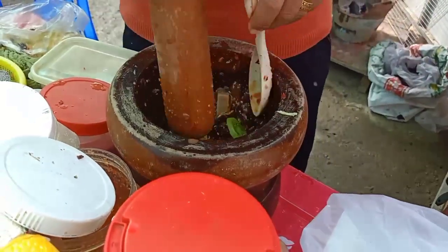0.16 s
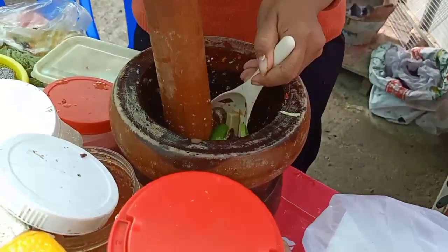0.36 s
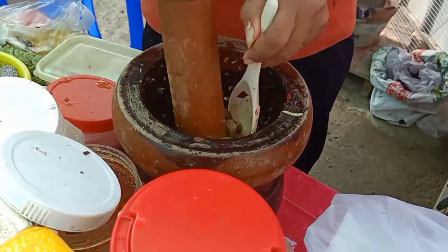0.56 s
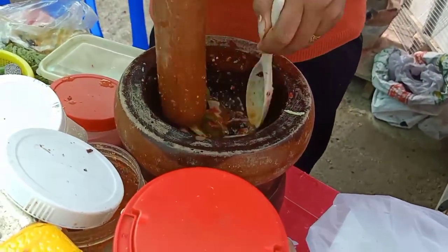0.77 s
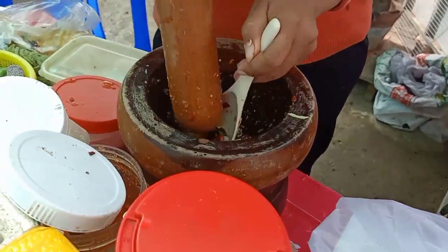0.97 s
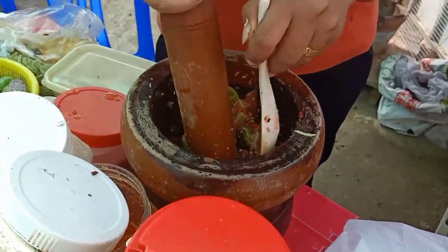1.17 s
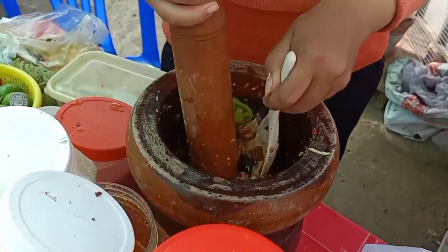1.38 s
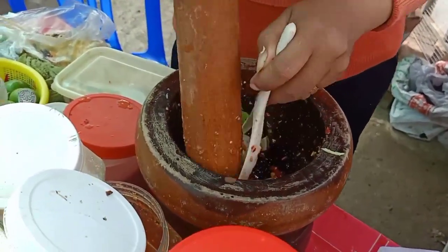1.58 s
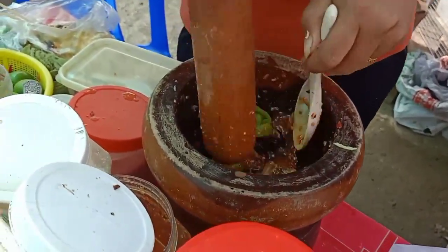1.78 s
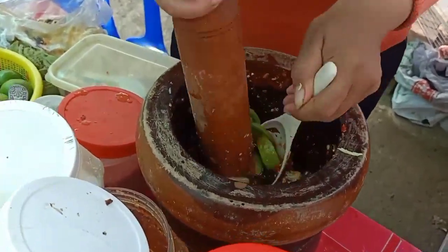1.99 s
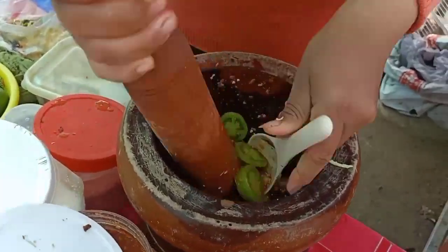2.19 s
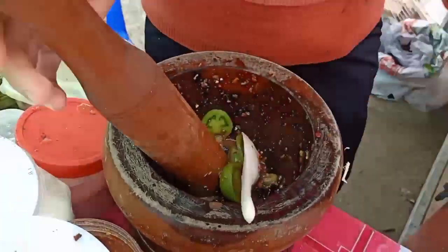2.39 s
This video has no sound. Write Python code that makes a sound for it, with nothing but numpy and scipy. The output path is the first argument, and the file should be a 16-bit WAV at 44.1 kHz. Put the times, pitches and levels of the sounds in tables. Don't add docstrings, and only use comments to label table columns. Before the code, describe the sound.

Close up at an outdoor stall, uneven pestle blows knock a hollow clay bowl and squash wet food, gritty spoon scrapes fill the gaps, and light taps end it over low traffic rumble, heard in phone stereo.

```python
import sys
import numpy as np
from scipy import signal
from scipy.fft import rfft, irfft, next_fast_len
from scipy.io import wavfile
from scipy.ndimage import uniform_filter1d, map_coordinates

SR = 44100
rng = np.random.default_rng(int(sys.argv[2]) if len(sys.argv) > 2 else 0)


def file_out(sig):
    cols = np.atleast_2d(sig).T
    lim = np.clip(cols, -1, 1)
    pcm = np.round(lim * 32767).astype(np.int16)
    wavfile.write(sys.argv[1], SR, pcm)


def boost_factor(decibels):
    exponent = np.asarray(decibels, float) / 20
    return 10 ** exponent


N = 108045


def unit(x):
    return x / np.sqrt(np.mean(x ** 2) + 1e-20)


def along(points, hz):
    f, v = np.transpose(points)
    return np.interp(np.log(hz + 1), np.log(f + 1), v)


def wobble(knots_per_s):
    knots = rng.standard_normal(int(N * knots_per_s / SR) + 4)
    return map_coordinates(knots, [np.arange(N) * knots_per_s / SR])


def filtered(x, response):
    m = next_fast_len(N + 8192)
    return irfft(rfft(x, m) * response(np.fft.rfftfreq(m, 1 / SR)), m)[..., :N]


def resonances(table):
    def response(f):
        total = 0
        for k, (hz, width_hz, db) in enumerate(table):
            band = 1j * f * width_hz / (hz * hz - f * f + 1j * f * width_hz)
            total = total + (-1) ** k * boost_factor(db) * band
        return total
    return response


# start in seconds, peak in dB, second ring over first in dB,
# third ring over first in dB, left-right in dB.
BLOWS = [
    (0.058, -19, -27.5, -7, -3.5),
    (0.3212, -14, -19.5, -8, 0.5),
    (0.367, -28.5, -23, -31, 1),
    (0.612, -31, -24, -21, -3.5),
    (0.844, -17.5, -19, -13, -1.5),
    (1.381, -16.5, -18, -19, 0),
    (1.679, -26, -42, -17, -7),
    (1.948, -15, -21.5, -9, -6),
    (2.358, -51, -14, 3, -0.5),
    (2.431, -44.5, -17, 12.5, -8),
]
CONTACT_MS = [1.25, 2.84, 1.8, 0.86, 3.5, 3.1, 1.3, 3.2, 0.45, 0.16]
THUMP_DB = [0, -3, 7, -2, -3, -0.5, 9.5, -9, .1, 9]
LOW_MODES_DB = [5, -1, 3, 4, 4, 0, -1, -4, 19.5, -6]
# frequency in Hz, level in dB, t60 in seconds, left-right in dB,
# left lead in radians.
FIRST_MODES = [(788.7, 5.5, 0.06, 4.5, -0.76), (693, -9, 0.039, -4.5, -0.79), (546, -31, 0.083, 8, -0.63),
               (1000, -8, 0.015, 27, 0.16)]
SECOND_MODES = [(1333, 5, 0.056, -28, 0.16), (1405, 4.3, 0.07, -6, 0.3)]
THIRD_MODES = [(2090, 3, 0.034, .1, 1.64), (1770, -9, 0.062, -2.5, -1.9), (2400, -6, 0.048, -4, 2.8),
               (3000, -4, .016, -1, 2.1)]
TABLE_MODES = [(175.5, -19, 0.064, .1, .05), (240, -41.5, 0.14, 0.044, .05)]
# frequency in Hz, width in Hz, level in dB.
SQUEEZE = [(563, 220, 3.5), (970, 360, 2.5), (2600, 1050, -13.5)]
SLAP_DB, SLAP_T60_S = -24.5, 0.0075
SQUEEZE_DB, SQUEEZE_T60_S = -12, 0.041
CHOKE = 1.086
SCATTER_DB, DETUNE = 6.5, 0.005
SAME, OPPOSED = 1, -1


def ring(modes, pan_db, flip, t):
    side = np.array([[0.5], [-0.5]])
    total = np.zeros((2, len(t)))
    for k, (hz, db, t60_s, lean_db, lead) in enumerate(modes):
        if k > 0:
            db = db + rng.normal(0, SCATTER_DB)
            hz = hz * (1 + rng.normal(0, DETUNE))
        decay = boost_factor(db + side * (lean_db + pan_db) - 60 * (t / t60_s) ** CHOKE)
        total += flip ** k * decay * np.sin(2 * np.pi * hz * t + side * lead)
    return total


def pestle():
    out, t = np.zeros((2, N + SR)), np.arange(SR // 4) / SR
    for blow, contact_ms, thump_db, low_db in zip(BLOWS, CONTACT_MS, THUMP_DB, LOW_MODES_DB):
        start_s, peak_db, second_db, third_db, pan_db = blow
        body = ring(FIRST_MODES[::3], pan_db, SAME, t)
        body += boost_factor(low_db) * ring(FIRST_MODES[1:3], pan_db, SAME, t)
        body += boost_factor(second_db) * ring(SECOND_MODES, 0, OPPOSED, t)
        body += boost_factor(thump_db) * ring(TABLE_MODES, 0, SAME, t)
        slap = boost_factor(SLAP_DB - 60 * t / SLAP_T60_S) * rng.standard_normal((2, len(t)))
        dull = unit(filtered(rng.standard_normal(len(t)), resonances(SQUEEZE))[:len(t)])
        squeeze = boost_factor(SQUEEZE_DB - 60 * t / SQUEEZE_T60_S) * dull
        sharp = boost_factor(third_db) * ring(THIRD_MODES, 0, SAME, t) + slap + squeeze
        press = (1 - np.exp(-t * 2000 / contact_ms)) ** 2
        onset = 1 - np.exp(-t / 0.00025)
        at = round(start_s * SR)
        out[:, at:at + len(t)] += boost_factor(peak_db) * (body * press + sharp * onset)
    return out[:, :N]


# start in seconds, length in seconds, grit in dB, bowl over grit in dB,
# rise as share of the length.
STROKES = [(0.075, 0.091, -44, 8, 0.26), (0.222, 0.023, -46.5, 1, 0.16), (0.283, 0.071, -44, -4, 0.081),
           (0.324, 0.1, -46, 7, 0.35), (0.596, 0.11, -53, 12.5, 0.077), (0.749, 0.013, -48, -5, .08),
           (0.819, 0.071, -47.5, -4, .2), (0.863, 0.085, -42, 6, 0.67), (0.97, 0.063, -60.5, 2.5, 0.23),
           (1.13, 0.085, -47, 3.5, 0.48), (1.187, 0.042, -49.5, 7.5, 0.028), (1.343, 0.11, -43.5, -7, 0.3),
           (1.42, 0.083, -50, 9, 0.21), (1.48, 0.18, -64.5, 16, 0.23), (1.671, 0.038, -48.5, 2.5, 0.12),
           (1.699, 0.09, -47.5, 8, 0.33), (1.815, 0.065, -44, -6.5, 0.025),
           (1.912, 0.029, -46.5, -0.5, .08), (1.978, 0.071, -48, 7, 0.22), (2.229, 0.068, -51, 6, .2),
           (2.28, 0.065, -65, 8.5, 0.22)]
# frequency in Hz, level in dB per Hz.
GRIT = [(1470, -47), (2500, 7.5), (3360, 1.5), (3800, -1.5), (5150, 5.5), (8330, -17.5), (10400, -20),
        (13700, -15.5), (16000, -50)]
# frequency in Hz, width in Hz, level in dB.
BOWL = [(678, 44.5, 2.5), (1003, 28, -3.5), (1279, 43, 0.5), (1570, 216, -4), (2114, 192, 1),
        (2750, 360, -5.5)]
# frequency in Hz, width in Hz, level in dB.
SPOON = [(3890, 266, 10.5), (5400, 460, 6)]
STROKE_FALL = 0.33
JUDDER_DB, CLUMP_DB, GRAIN_DB, ROUGH_TOP_DB = 1.8, 3.5, 4, 9
WET_DB = 1


def spoon():
    t, grit, bowl = np.arange(N) / SR, np.zeros(N), np.zeros(N)
    for start_s, length_s, grit_db, bowl_db, rise in STROKES:
        u = (t - start_s) / length_s
        shape = np.clip(np.minimum(u / max(rise, 0.02), (1 - u) / STROKE_FALL), 0, 1)
        grit += boost_factor(grit_db) * shape
        bowl += boost_factor(grit_db + bowl_db) * shape
    rough_db = JUDDER_DB * wobble(70) + CLUMP_DB * wobble(250) + GRAIN_DB * wobble(1100)
    rough = unit(boost_factor(np.minimum(rough_db, ROUGH_TOP_DB)))

    def bright(hz):
        return boost_factor(along(GRIT, hz)) * (1 + resonances(SPOON)(hz))

    def scrape(level, response):
        gain = np.sqrt(np.mean(abs(response(np.fft.rfftfreq(4096, 1 / SR))) ** 2))
        return filtered(level * rough * rng.standard_normal((2, N)), response) / gain

    return boost_factor(WET_DB) * squelch(grit, bowl) + scrape(grit, bright) + scrape(bowl, resonances(BOWL))


GRAINS_PER_S, GRAIN_HZ, GRAIN_OCTAVES, GRAIN_CYCLES = 800, 2400, 0.8, 18
GRAIN_SIZE_DB, GRAIN_TOP_DB = 4, 9
SPLIT_HZ = 2900


def squelch(grit, bowl):
    count = round(GRAINS_PER_S * N / SR)
    when, pitch, size, phase = rng.random((count, 4)).T
    start, t = (when * N).astype(int), np.arange(600) / SR
    octaves = GRAIN_OCTAVES * np.log(pitch / (1 - pitch)) / 2
    hz = GRAIN_HZ * 2 ** octaves.clip(-1.6, 2)[:, None]
    stroke = np.where(hz[:, 0] > SPLIT_HZ, grit[start], bowl[start])
    gain = stroke * boost_factor(np.minimum(-GRAIN_SIZE_DB * np.log(size), GRAIN_TOP_DB))
    decay = gain[:, None] * boost_factor(-60 * t * hz / GRAIN_CYCLES) * (1 - np.exp(-t * hz / 2))
    turn = 2 * np.pi * (hz * t + phase[:, None])
    at = (start[:, None] + np.arange(600)).ravel()
    return np.array([np.bincount(at, (decay * wave(turn)).ravel(), N + 600)[:N] for wave in (np.sin, np.cos)])


# start in seconds, peak in dB, frequency in Hz.
TICKS = [(0.1, -16.5, 3870), (0.11, -24, 2250), (0.13, -38, 2600), (.153, -17.5, 2090), (0.231, -23, 5800),
         (.776, -35, 5170), (0.284, -29, 4630), (.311, -20.5, 2980), (.378, -17, 5400), (.390, -21, 2210),
         (.624, -17.5, 2750), (0.753, -30, 4740), (.833, -23, 4800), (0.898, -14.5, 2090),
         (.937, -28, 4500), (.925, -21, 2100), (1.186, -18.5, 1025), (1.208, -18.5, 990),
         (1.359, -24, 5100), (1.444, -17.5, 2460), (1.461, -17.5, 3840), (1.492, -22, 1970),
         (1.765, -24, 2500), (1.8141, -14.5, 5030), (1.862, -18, 4070), (1.919, -28, 2470),
         (1.993, -16.5, 2530), (2.012, -27.5, 2280), (2.018, -17.5, 3130), (0.096, -40, 5000),
         (.114, -20, 5100), (.119, -35, 2340), (0.1318, -22, 4820), (0.137, -41, 3000), (.212, -36, 4500),
         (0.237, -25, 4500), (1.002, -39.5, 5000), (1.148, -32, 2500), (1.207, -31, 7040),
         (1.16, -36, 4800), (1.189, -29, 5360), (1.37, -26.5, 5000), (1.376, -24.5, 4600),
         (1.4074, -22.5, 5040), (1.412, -29, 3000), (1.4635, -24, 4540), (1.79, -26, 3000),
         (1.816, -17.5, 3000), (1.836, -23.5, 4500), (1.857, -31, 4940), (1.8733, -24.5, 4700),
         (1.924, -28, 4500), (1.932, -30, 2500), (2.004, -38, 4900), (2.108, -41.5, 5670),
         (2.196, -39, 5500), (2.238, -40, 3900), (2.261, -29, 4850), (2.277, -36, 4230), (.36, -27, 4930),
         (1.779, -36, 4900), (2.309, -32, 3270), (2.331, -42, 3080), (2.342, -32, 2660)]
# start in seconds, peak in dB, frequency in Hz.
BUMPS = [(.078, -28, 593), (.23, -31, 647), (.294, -37, 670), (.604, -29.5, 1280), (.157, -21, 2130),
         (.9095, -27.5, 1030), (1.734, -24, 2400), (2.035, -38, 600), (2.4315, -26.5, 1000),
         (.14, -34.5, 576), (0.103, -21, 1580), (.146, -26, 1350), (2.012, -31, 1290), (1.461, -28, 1610),
         (.645, -23.5, 765), (.75, -37, 670), (.908, -25.5, 684), (1.004, -42, 640), (1.037, -36, 680),
         (1.19, -22, 1540), (1.202, -27, 1160), (1.2105, -22, 1290), (1.218, -25, 1590), (1.442, -31, 680),
         (1.548, -43, 689), (1.741, -22.5, 1290), (1.815, -25, 1040), (2.025, -28, 750), (2.042, -37, 810),
         (2.251, -28, 1310), (2.429, -32.5, 875)]
TICK_CYCLES, TICK_RISE_S = 34, 0.0009
SNAP_DB, SNAP_T60_S = -15, 0.011
SNAP_REF_HZ, SNAP_GROWTH = 4500, 1.76


def ticks():
    out, t, m = np.zeros((2, N + SR)), np.arange(1000) / SR, 4096
    quadrature = np.array([[0], [np.pi / 2]])
    grit = boost_factor(along(GRIT, np.fft.rfftfreq(m, 1 / SR)))
    for (start_s, peak_db, hz), gritty in [(row, 1) for row in TICKS] + [(row, 0) for row in BUMPS]:
        tone = boost_factor(-60 * t * (hz + 1200) / TICK_CYCLES) * np.sin(2 * np.pi * hz * t + quadrature)
        burst = boost_factor(-60 * t / SNAP_T60_S) * rng.standard_normal((2, len(t)))
        snap = boost_factor(SNAP_DB) * unit(irfft(rfft(burst, m) * grit, m)[:, :len(t)]) / 4
        snap *= gritty * (hz / SNAP_REF_HZ) ** SNAP_GROWTH
        at = round(start_s * SR)
        out[:, at:at + len(t)] += boost_factor(peak_db) * (tone * (1 - np.exp(-t / TICK_RISE_S)) + snap)
    return out[:, :N]


# frequency in Hz, left lead in radians.
LEADS = [(700, -0.47), (1050, 1.23), (1400, -1.88), (2100, -2.0), (2750, -2), (5150, -4.5), (11400, -11.5)]
# frequency in Hz, left-right in dB.
LEANS = [(350, 0.4), (1050, -4), (1400, -4.5), (2100, -3.5), (3450, -3), (5150, 3.5), (6200, 2),
         (9000, 1.5)]


def ports(pair, alike):
    def spread(hz):
        angle = np.arccos(np.clip(along(alike, hz), 0, 1)) / 2
        return np.array([np.cos(angle), np.sin(angle)])

    def tilt(hz):
        half = boost_factor(along(LEANS, hz) / 2) * np.exp(0.5j * along(LEADS, hz))
        return np.array([half, 1 / half])

    mid, side = filtered(pair, spread)
    return filtered(np.array([mid + side, mid - side]), tilt)


STALL_T60_S = 0.1


def stall(x):
    t = np.arange(SR // 4) / SR
    tail = boost_factor(-60 * t / STALL_T60_S) * rng.standard_normal((2, len(t)))
    return signal.fftconvolve(x, tail / np.linalg.norm(tail[0]), axes=1)[:, :N]


# frequency in Hz, level in dB per Hz.
HISS = [(200, -9), (320, -4), (900, -6.5), (2400, -3.5), (3300, -14.5), (5200, -18), (7500, -38),
        (11500, -43), (15000, -44.5)]
# time in seconds, level in dB.
HISS_DB = [(0.0, -52), (0.27, -55.5), (0.39, -53), (0.99, -53), (1.3, -55), (1.86, -50), (2.01, -52.5),
           (2.45, -52.5)]
# frequency in Hz, level in dB per Hz.
RUMBLE = [(15, -75), (40, -7), (91, 7.5), (125, 8), (171, 3), (219, 2.5), (387, -13), (420, -46),
          (550, -45), (920, -120)]
# multiple of the base rate, level in dB.
ENGINE_ORDERS = [(3, -19), (4, -1.5), (5, -0.5), (6, -2), (7, -9.5)]
# frequency in Hz, likeness from 0 to 1.
FAR_LIKENESS = [(150, 0.96), (350, 0.9), (700, 0.66), (1400, 0.48), (4000, 0.1)]
RUMBLE_DB, ENGINE_DB = -52.5, -54
FIRING_HZ, DRIFT = 27.96, 0.017


def street():
    def noise(spectrum):
        return unit(filtered(rng.standard_normal((2, N)), lambda hz: boost_factor(along(spectrum, hz))))

    hiss_db = np.interp(np.arange(N) / SR, *np.transpose(HISS_DB)) + 1.0 + 0.55 * wobble(24.61)
    hiss = boost_factor(hiss_db) * patchy(noise(HISS))
    rumble = boost_factor(RUMBLE_DB + 0.88 * wobble(4.55)) * noise(RUMBLE)
    turn = 2 * np.pi * np.cumsum(FIRING_HZ * (1 + DRIFT * wobble(2.82))) / SR
    engine = unit(sum(boost_factor(db + 4.6 * wobble(5.83)) * np.cos(round(k) * turn) for k, db in ENGINE_ORDERS))
    return ports(hiss + rumble, FAR_LIKENESS) + boost_factor(ENGINE_DB) * engine


PATCHY_DB = 2.5


def patchy(x):
    z = signal.stft(x, nperseg=512)[2]
    field = uniform_filter1d(rng.standard_normal(z.shape[1:]), size=6, axis=0)
    field = uniform_filter1d(field, size=8, axis=1)
    return signal.istft(z * boost_factor(PATCHY_DB * unit(field)), nperseg=512)[1][:, :N]


# frequency in Hz, likeness from 0 to 1.
NEAR_LIKENESS = [(300, 1), (2800, 0.9), (4000, 0.2), (9000, 0.19)]
STALL_DB = -14


def scene():
    near = pestle() + ports(spoon(), NEAR_LIKENESS) + ticks()
    return near + boost_factor(STALL_DB) * stall(near) + street()


def roll_off(x):
    return signal.sosfilt(signal.butter(12, 16260, fs=SR, output="sos"), x)


LOW_CUT_HZ, TOP_HZ = 50, 16100


def record(dry):
    def band(hz):
        return (hz < TOP_HZ) / (1 + (LOW_CUT_HZ / (hz + 1)) ** 4)

    return roll_off(filtered(dry, band))


dry = scene()
out = record(dry)
file_out(out)
```